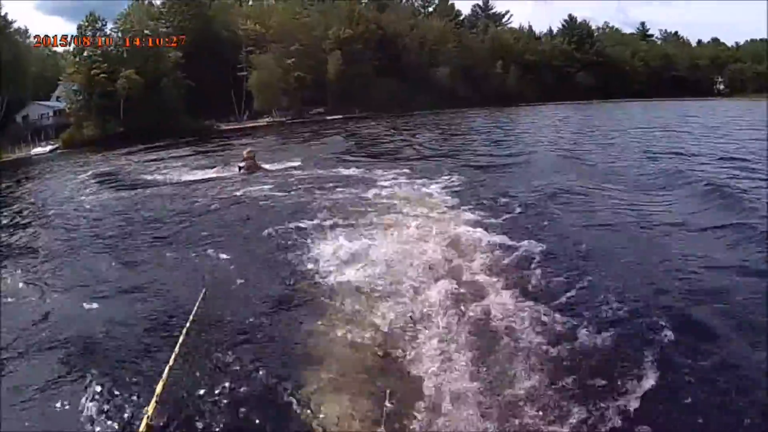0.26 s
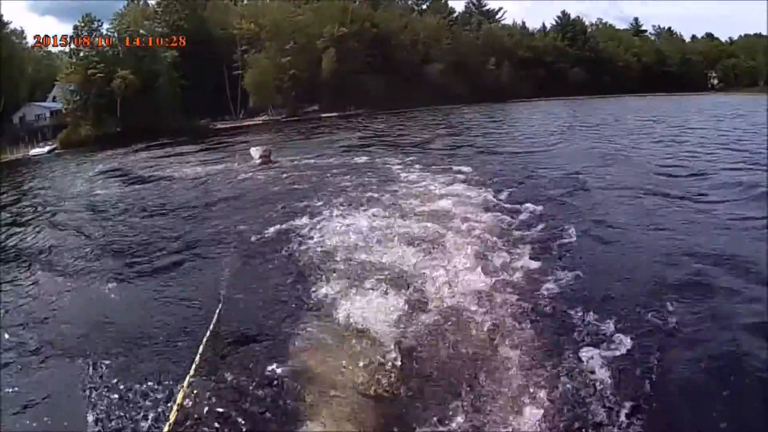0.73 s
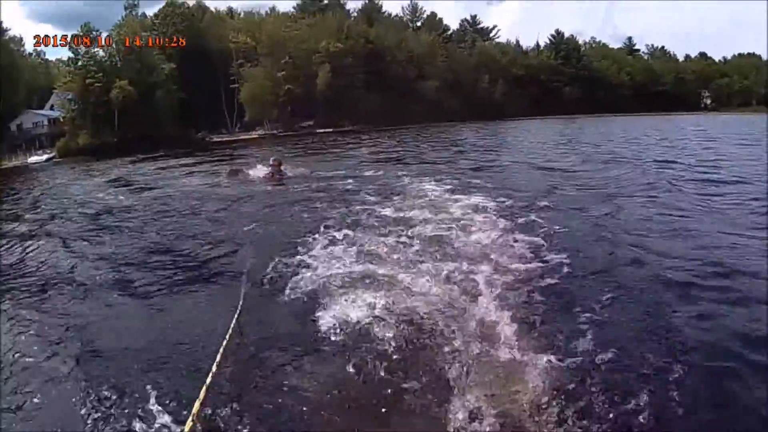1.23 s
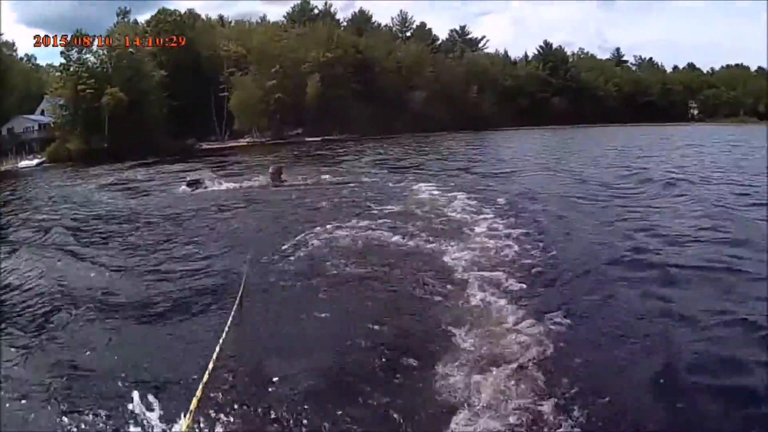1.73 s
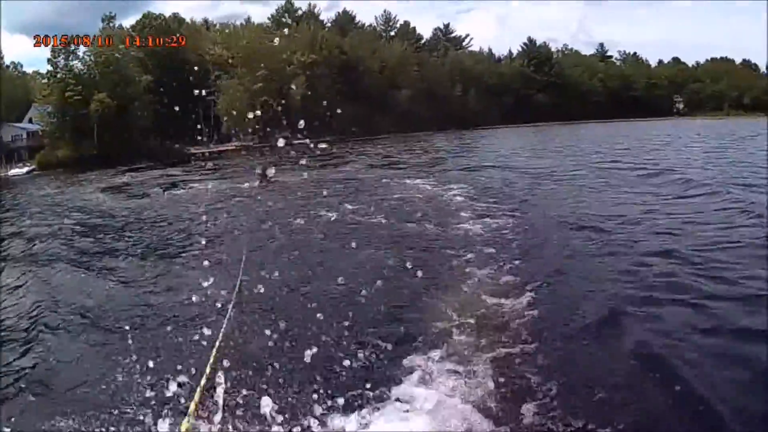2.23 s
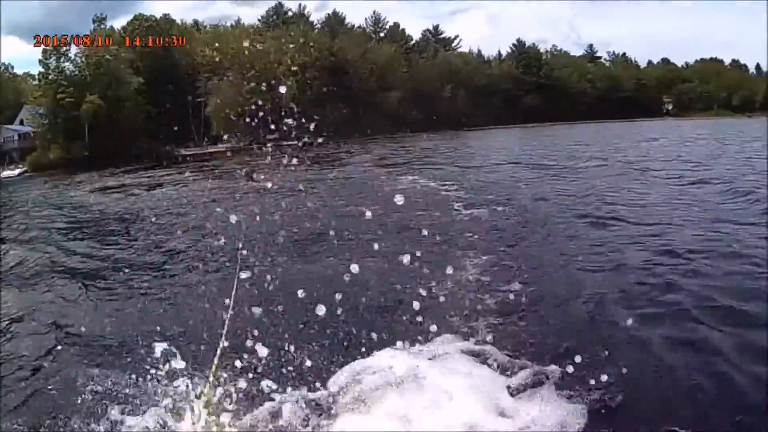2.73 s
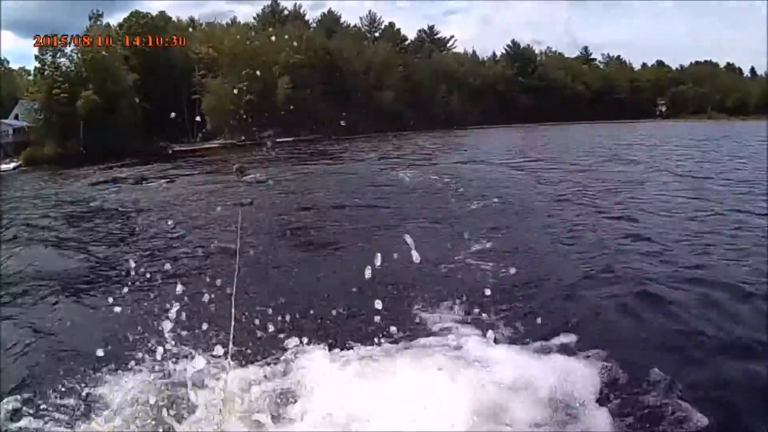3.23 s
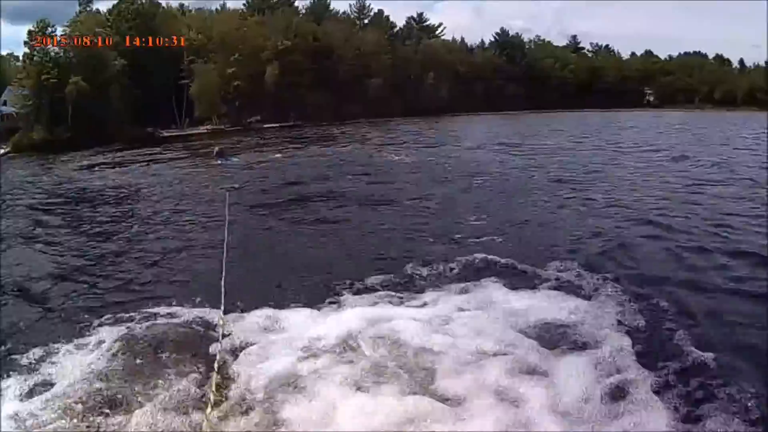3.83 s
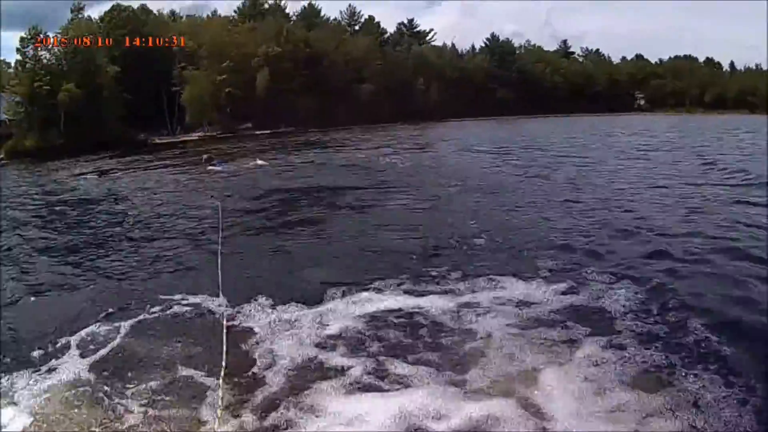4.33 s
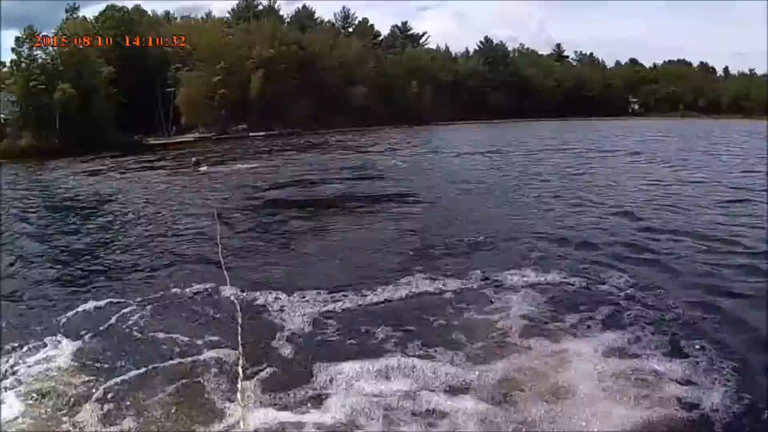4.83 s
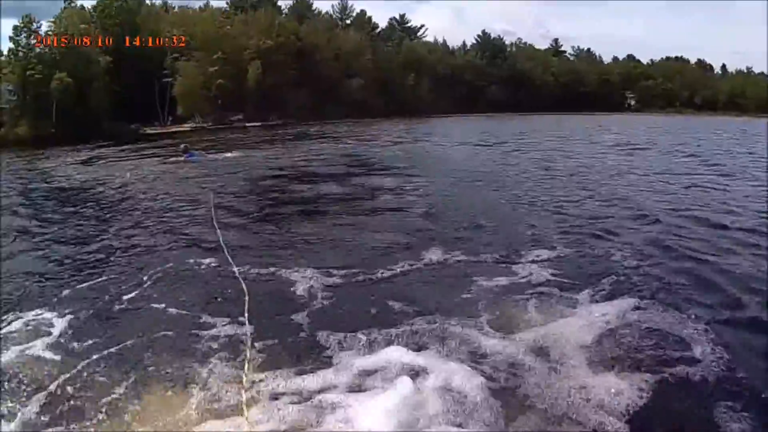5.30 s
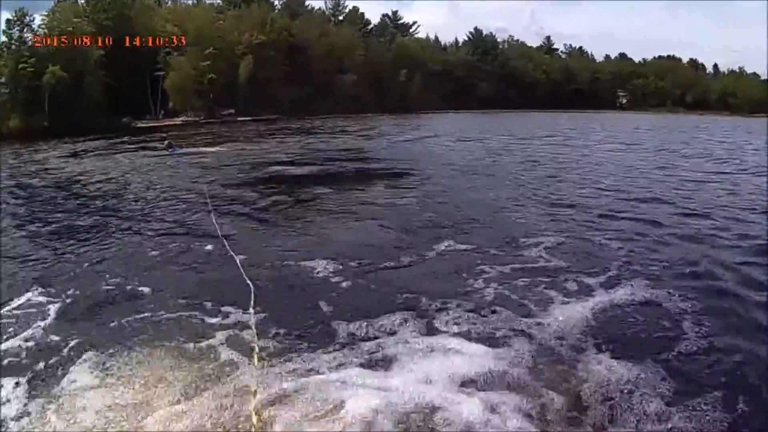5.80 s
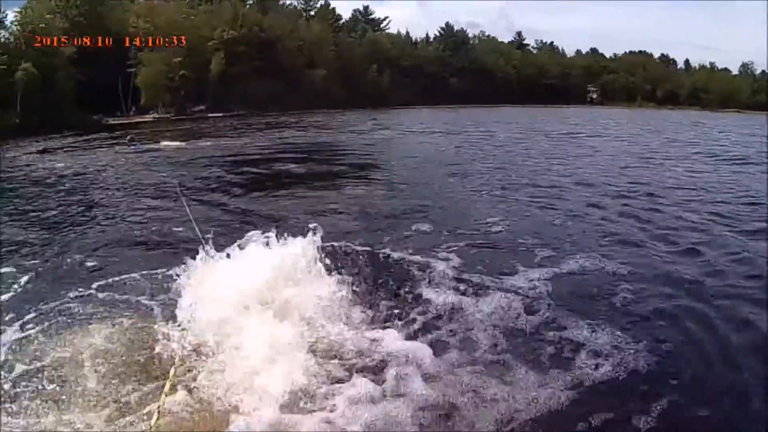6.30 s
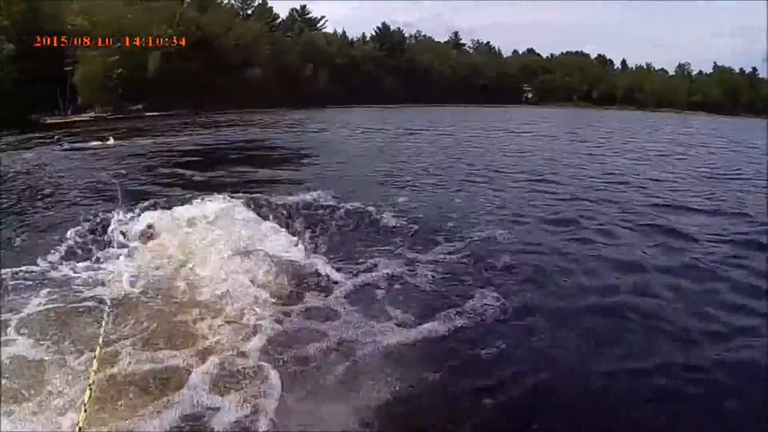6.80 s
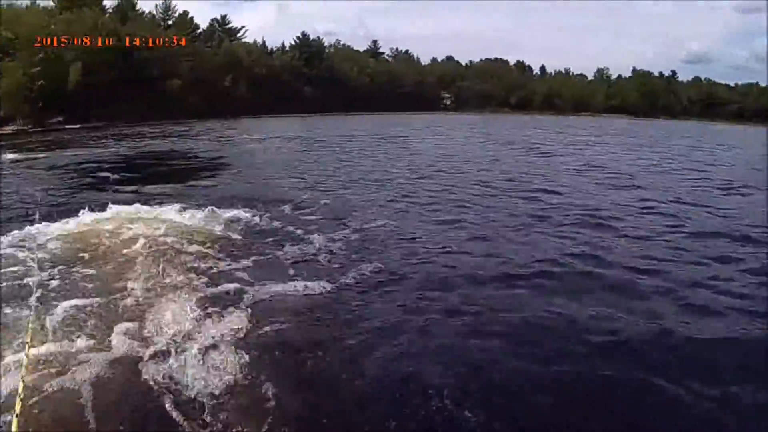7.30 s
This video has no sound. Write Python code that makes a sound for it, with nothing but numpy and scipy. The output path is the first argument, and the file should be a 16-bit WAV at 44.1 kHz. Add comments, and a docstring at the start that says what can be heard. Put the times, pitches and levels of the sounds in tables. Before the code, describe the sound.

A low twin-cylinder watercraft engine burbles at idle, blipping up in throttle several times amid gurgling exhaust, churning wake, splashes and spray.

```python
"""Slow personal watercraft, heard from its stern

A personal watercraft crosses a lake with five blips of throttle. Harmonics of the shaft frequency, shaped
by pipe resonances, form the drone of its twin-cylinder exhaust. Filtered noise and bubble resonances,
pulsed by the same shaft, give the ragged puffs, glugs and surging churn of the wake. Random impacts make
the patter of spray, shaped noise the splashes and knocks, and two wavering sinusoids a faint drive whine."""
import sys
import numpy as np
from scipy import signal
from scipy.fft import rfft, irfft
from scipy.io import wavfile

SR = 44100
rng = np.random.default_rng(int(sys.argv[2]) if len(sys.argv) > 2 else 0)


def materialize(psi):
    """Save the field psi as 16-bit PCM at rate SR to the path in sys.argv[1].

    A 1-D psi becomes a single channel; in a 2-D psi each row is a channel.
    """
    bounded = np.clip(np.atleast_2d(psi).T, -1, 1)
    quanta = np.round(bounded * 32767).astype(np.int16)
    wavfile.write(sys.argv[1], SR, quanta)


N = 333004
TIME = np.arange(N) / SR  # s

# fizz of the foam, before its flicker: t/s, level/dB
FOAM = [(0.05, -49.5), (0.46, -47.5), (3.5, -52.5), (3.8, -58.5), (4.35, -61), (4.7, -55.5), (5.82, -58.5),
        (5.94, -51), (7.02, -56.5), (7.27, -49), (7.5, -55)]
# steady churning of the wake: t/s, level/dB
WAKE = [(0, -20.5), (1.1, -22.5), (1.5, -23), (2.15, -36), (2.6, -21), (3.2, -22.5), (3.35, -28.5),
        (4.3, -28), (4.55, -24.5), (5.4, -26), (6.95, -24.5), (7.55, -21)]
# relative spectral density of each kind of water noise: f/Hz, level/dB
CHURN_COLOUR = [(260, -5), (400, -1), (540, -3), (750, -3), (930, 0.5), (1020, -4), (1090, -2), (1350, -6),
                (1650, -22.5), (2200, -28)]
SPRAY_COLOUR = [(1000, 8.5), (1960, 6), (2230, 0.5), (2600, 1), (3700, -4.5), (4200, -11.5), (4600, -7.5),
                (5400, -11), (6300, -20.5), (6950, -13), (7700, -21)]
FOAM_COLOUR = [(5000, -2), (7000, 4), (8500, -7), (9700, -5.5), (10700, 0), (11700, -2.5), (13200, -11),
               (15200, -9.5), (16000, -22)]
GURGLE_COLOUR = [(100, 6), (135, 3.5), (195, 4.5), (285, 2.5), (350, 0), (420, 2.5), (540, -9.5)]
RUMBLE_COLOUR = [(30, 5.3), (45, 13.4), (62, 13), (100, 7.7)]
# large gulps of exhaust gas: t/s, starting f/Hz, ending f/Hz, length/s, peak level/dB
GLUGS = [(.155, 165, 143, 0.051, -8), (.68, 157, 188, 0.087, -10.5), (0.741, 208, 237, 0.047, -15),
         (0.924, 374, 390, 0.035, -13), (1.601, 221, 243.7, 0.04, -8), (1.76, 166.5, 155, 0.094, -9.5),
         (2.195, 115, 110, 0.07, -12.5), (2.286, 275.3, 287, 0.045, -9.5), (2.462, 204, 253, 0.043, -5),
         (2.741, 217, 321, 0.071, -6.5), (2.97, 148, 161, 0.062, -14), (6.825, 106, 85, 0.033, -5)]
# slaps and splashes: t/s, bright crash level/dB, dark slap level/dB
SPLASHES = [(0.211, -20.5, -12.5), (0.379, -24, -12.5), (0.649, -23, -22), (0.698, -35, -10.5),
            (1.577, -38, -16.5), (2.092, -20, -24), (2.129, -26, -18), (2.198, -31, -22), (2.511, -39, -28),
            (2.378, -22.5, -36), (2.863, -20.5, -17), (2.883, -19, -30), (3.425, -36, -38), (4.5, -41, -34),
            (5.677, -30, -18), (5.879, -31, -15), (5.923, -29.5, -33), (5.985, -20.5, -17),
            (6.316, -31, -24), (6.572, -28, -13.5), (7.126, -29.5, -22), (7.308, -31, -14.5),
            (7.458, -28, -17)]
# brief high ticks of single drops: t/s, starting level/dB
DROPS = [(.169, -36), (0.27, -34), (.382, -34), (0.919, -39), (3.57, -41), (5.945, -38), (7.252, -37)]
# air pockets clapping shut: t/s, starting f/Hz, peak level/dB
PLOPS = [(1.665, 710, -5), (1.708, 650, -1.5), (2.979, 870, -6.5), (5.968, 734, -7), (6.14, 433, -17),
         (6.15, 980, -2.5), (7.244, 703, -11)]
# surges of white water: t/s, attack/s, length/s, release/s, churn level/dB, gurgle level/dB (before its
# share of the flow), growth while it lasts/(dB/s)
SURGES = [(0.645, 0.042, 0.043, 0.013, -16.5, -30, -6), (0.851, 0.021, 0.062, 0.22, -17, -20, -1),
          (1.12, 0.053, 0.052, 0.15, -22, -14.5, -17), (1.555, 0.034, 0.15, 0.57, -19, -16.5, 14),
          (2.192, 0.029, 0.27, 0.075, -14.5, -16.5, -10.5), (2.694, 0.055, 0.38, 0.033, -18.5, -15.5, -6),
          (4.8, 0.078, 0.5, .15, -41, -19.5, -16), (5.927, 0.07, 0.15, 0.055, -17.5, -22, -6),
          (6.097, 0.022, 0.14, 0.017, -16, -14.5, -15), (6.303, 0.013, 0.057, 0.018, -18.5, -14.5, -9),
          (6.415, 0.052, 0.079, 0.049, -20, -17, 5), (6.732, 0.054, 0.099, 0.031, -25, -40, -8),
          (7.15, 0.096, 0.33, 0.016, -20, -20, -1)]
# firing note at idle speed, before chokes: t/s, rms level/dB
FIRING = [(0, -34), (.13, -23.5), (.8, -27), (1.18, -20), (1.45, -21.5), (1.6, -32), (1.95, -19.5),
          (2.7, -20), (2.9, -21.5), (3.25, -20.5), (3.7, -18), (4.3, -20), (4.75, -18), (6.5, -18.5),
          (6.7, -21.5), (6.97, -24), (7.06, -13.5), (7.55, -18)]
# third shaft order at idle speed, before flutter: t/s, rms level/dB
THIRD = [(.06, -13), (.2, -19.5), (.35, -14), (.7, -24), (.85, -15.5), (1.05, -31), (1.44, -16.5),
         (1.6, -24.5), (3.3, -21.5), (3.5, -21.5), (4.21, -21), (4.33, -24), (4.5, -20), (5.45, -28),
         (5.56, -15.5), (5.73, -23.5), (5.96, -18.5), (6.2, -24)]
# fourth shaft order relative to the third: t/s, level/dB
FOURTH = [(0, -19), (.25, -13), (.65, -3), (.9, -25.5), (7.55, -13)]
# resonances of exhaust and muffler, before tuning: f/Hz, half width/Hz, gain at the peak/dB
PIPE = [(76.4, 16, -17.5), (241.3, 23.7, -17.5), (400.5, 13.7, -27), (786, 270, -38)]
# tuning of those resonances as water rises and falls in the pipe: t/s, frequency ratio
PIPE_TUNING = [(.4, 0.85), (1.3, 1.043), (4.2, 1.023), (5.35, 0.981), (6.2, 1.035)]
# change of the growl as the outlet dips and clears: t/s, level/dB
OUTLET = [(0, -2), (.7, -3.5), (1.05, -6), (1.75, -1.5), (2.05, -7), (2.6, -2), (3.25, -2.5), (3.6, -4),
          (4.4, -5), (5.35, 0), (5.7, -3.5), (7.55, -8.5)]
# water smothers the outlet and chokes the firing note: t/s, half length/s, depth/dB
CHOKES = [(1.723, 0.093, 2.5), (2.493, 0.033, 13), (3.02, 0.032, 9), (6.145, 0.045, 19), (6.322, .014, 17),
          (7.24, 0.048, 4)]
# thin tones of the drive, before their wavering: f/Hz, peak level/dB
WHINE = [(4425, -66), (5160, -62)]
# shaft speed between blips: t/s, f/Hz
IDLE = [(0, 46.2), (.3, 44.65), (.8, 45.75), (1.0, 43.93), (3.37, 44.38), (3.58, 41.18), (3.85, 43.75),
        (4.08, 44.22), (4.22, 42.9), (4.6, 44.67), (5.35, 46.43), (5.53, 44.49), (5.95, 46.1), (6.9, 43.84),
        (7.08, 47.83), (7.55, 52.83)]
# blips of throttle: start t/s, rise/s, coast/s, speed gained/Hz
BLIPS = [(1.6, .18, 0.42, 34.2), (2.29, 0.26, 0.24, 28.8), (2.78, 0.25, 0.33, 34.6), (5.99, .21, .475, 33),
         (7.381, 0.11, 0.63, 11)]
# how every blip runs down: share of the coast, share of the gained speed left
COAST = [(0, 1), (.17, .76), (.43, .48), (.82, .34), (1, 0)]

RISE_CURVE = 1.15  # exponent above 1: the shaft picks up slowly at first
LIFT_DB, LIFT_HZ = 7, 6.9  # the firing note grows by this much over the first few Hz above idle
LULL_DB, LULL_LEAD_S, LULL_S = 8, 0.014, 0.034  # the engine quietens just before settling to idle
THIRD_DB_PER_OCTAVE = -21.5  # the third order fades as the shaft speeds up
THROB_DB, STEADYING = 2.0, 0.55  # firings differ in strength; share of this lost while coasting
BARK_HZ, BARK_WIDTH_HZ, BARK_DB = 370, 200, -23.5  # broad rasp of the pipe on open throttle
CLATTER_DB, CLATTER_S = -36.5, 0.0013  # rms level and decay of the knocks
# layers following the wake: (dB when the wake is at WAKE_REF_DB, dB gained per dB of wake)
GURGLE, RUMBLE, SPRAY = (-23, 0.3), (-29, 0.68), (-36.5, 0.45)
WAKE_REF_DB, FOAM_REF_DB = -26.5, -54
SPRAY_PER_FOAM_DB = 0.53  # more droplets fall while the foam is fresh
THROWN_DB = -13.5  # spray thrown up by a surge, relative to its churn
CLEAR_DB = 2  # a coasting engine blows cleanly, with this much less gurgle
PLOP_CYCLES = 0.58  # cycles until a plop is loudest
SPLASH_T60_S, SPLASH_RISE_S = 0.059, 0.0032
PATS_PER_S, PAT_S, PAT_DB = 30, 0.002, -12  # rate, decay, and level relative to the spray
EDGE_HZ = 15750  # upper limit of the whole sound


def amp(db):
    """Level to amplitude ratio: 20 dB per factor of ten."""
    return 10 ** (np.asarray(db) / 20)


def unit(x):
    """Normalisation to an rms value of 1."""
    return x / np.sqrt(np.mean(x ** 2) + 1e-20)


def curve(table):
    """Linear interpolation of a timed table, sample by sample."""
    return np.interp(TIME, *np.transpose(table))


def hump(s, width_s):
    """Gaussian bump of height 1 around a moment."""
    return np.exp(-((TIME - s) / width_s) ** 2)


def add(mix, s, sound):
    """Superposition of a sound starting at a given time."""
    part = mix[max(round(s * SR), 0):][:len(sound)]
    part += sound[:len(part)]


def colour(x, points):
    """Minimum-phase filtering: the Hilbert transform of log gain gives a causal response; rms 1 out."""
    size = 8192
    hz, db = np.transpose(points)
    octave = np.log2(np.abs(np.fft.fftfreq(size, 1 / SR)) + 1)
    knots = np.log2(hz)
    outside = np.abs(octave - np.clip(octave, knots[0], knots[-1]))
    # 24 dB per octave of fall past either end
    gain_db = np.maximum(np.interp(octave, knots, db) - 24 * outside, -100)
    log_gain = np.log(amp(gain_db))
    response = np.fft.ifft(np.exp(np.conj(signal.hilbert(log_gain)))).real[:size // 2]
    return unit(signal.oaconvolve(x, response)[:len(x)])


def wander(hz):
    """Low-passed random fluctuation, rms 1, with a Gaussian roll-off at the given rate."""
    s = np.arange(0, N / SR + 1, 0.001)
    f = np.fft.rfftfreq(len(s), s[1])
    spectrum = rfft(rng.standard_normal(len(s))) * np.exp(-(f / hz) ** 2)
    return np.interp(TIME, s, unit(irfft(spectrum, len(s))))


def band_noise(lo_hz, hi_hz):
    """Band-pass filtered white noise, rms 1."""
    sos = signal.butter(3, [lo_hz, hi_hz], "band", fs=SR, output="sos")
    return unit(signal.sosfilt(sos, rng.standard_normal(N)))


def patter(per_s, spread_db):
    """Random impulse train: many small impacts and a few large, rms 1."""
    size = amp(spread_db * np.minimum(rng.exponential(1, N), 5))
    hits = rng.random(N) < per_s / SR
    return unit(size * rng.choice([-1, 1], N) * hits)


def bubbles(lo_hz, hi_hz, per_s, cycles, spread_db, count):
    """Bubble resonance: many sizes ring and decay, each rising in pitch as it nears the surface."""
    out = np.zeros(N)
    for hz in np.geomspace(lo_hz, hi_hz, count):
        age = np.arange(0, 5, hz / (cycles * SR))  # in decay times
        ring = np.exp(-age) * np.sin(2 * np.pi * cycles * (age + 0.0469 * age ** 2))
        for when, size, side in rng.random((int(per_s * N / SR / count), 3)):
            level = amp(-spread_db * np.log(size + 0.046)) * np.sqrt(hz / lo_hz)
            add(out, when * N / SR, np.sign(side - 0.5) * level * ring)
    return unit(out)


def puffs(turns, depth, lag):
    """Pulsating gas flow: two puffs a turn, one cylinder blowing harder than the other."""
    angle = 2 * np.pi * (turns - lag)
    return unit(np.exp(depth * (np.cos(2 * angle) + 0.5 * np.cos(angle))))


def with_wake(db, slope):
    """Level dependence: gain of a layer that rises and falls with the wake."""
    return amp(db + slope * (curve(WAKE) - WAKE_REF_DB))


def whine():
    """Amplitude and frequency modulation: two thin tones of the drive come and go."""
    out = np.zeros(N)
    for hz, db in WHINE:
        phase = 2 * np.pi * np.cumsum(hz + 36 * wander(120)) / SR
        out += amp(db + 3.5 * wander(28)) * np.sin(phase)
    return out


def pats():
    """Exponentially decaying noise bursts: fat drops land with short taps."""
    hits = (rng.random(N) < PATS_PER_S / SR) * amp(3 * np.minimum(rng.exponential(1, N), 3))
    burst = signal.lfilter([1], [1, -np.exp(-1 / (PAT_S * SR))], hits)
    return amp(PAT_DB) * unit(burst * band_noise(1500, 4200))


def spray(surge):
    """Random impact noise: droplets rain on the lake and seethe where they land; the foam fizzes."""
    plinks = bubbles(1250.0, 6160, per_s=700, cycles=13.5, spread_db=2.0, count=36)
    impacts = patter(per_s=4500, spread_db=4.0)
    droplets = colour(impacts + rng.standard_normal(N) + 0.33 * plinks, SPRAY_COLOUR)
    fizz = colour(patter(per_s=3700, spread_db=5.0) + 0.83 * rng.standard_normal(N), FOAM_COLOUR)
    seethe = band_noise(1163, 1506)
    gusts = amp(1.3 * wander(30))
    froth = amp(1.5 * wander(28))
    steady = with_wake(*SPRAY) * amp(SPRAY_PER_FOAM_DB * (curve(FOAM) - FOAM_REF_DB))
    falling = np.hypot(steady, amp(THROWN_DB) * surge)
    return gusts * (falling * (droplets + seethe + pats()) + amp(curve(FOAM)) * froth * fizz)


def splashes():
    """Transient noise with exponential decay: sheets of water slap and crash; a few drops tick."""
    bright, dark, ticks = np.zeros((3, N))
    t = TIME[:SR // 4]
    rise = np.minimum(t / SPLASH_RISE_S, 1)
    shape = rise * np.exp(-np.log(1000) * np.maximum(t - SPLASH_RISE_S, 0) / SPLASH_T60_S)
    for s, crash_db, slap_db in SPLASHES:
        add(bright, s, amp(crash_db) * shape)
        add(dark, s, amp(slap_db) * shape)
    for s, peak_db in DROPS:
        add(ticks, s, amp(peak_db) * np.exp(-t / 0.0032))
    crash_colour = [(1800, 19.0), (3000, 5.5), (5800, -3.5), (12000, -18.0)]  # f/Hz, level/dB
    crash = colour(patter(per_s=4000, spread_db=1.5), crash_colour)
    return bright * crash + dark * band_noise(800, 1420) + ticks * band_noise(8300, 14000)


def plops():
    """Cavity resonance: a pocket of air trapped by falling water claps shut and rings a few cycles."""
    out = np.zeros(N)
    t = TIME[:SR // 20]
    for s, hz, db in PLOPS:
        age = t * hz / PLOP_CYCLES
        envelope = age * np.exp(1 - age)
        add(out, s, amp(db) * envelope * np.sin(2 * np.pi * hz * t * (1 + 0.0032 * age)))
    return out


def glugs():
    """Resonance of one large bubble: the pitch of each gulp slides as the bubble changes shape."""
    out = np.zeros(N)
    for s, start_hz, end_hz, length, db in GLUGS:
        hz = np.linspace(start_hz, end_hz, int(length * SR))
        swell = np.sin(np.pi * np.linspace(0, 1, len(hz)) ** 0.85)
        add(out, s, amp(db) * swell * np.sin(2 * np.pi * np.cumsum(hz) / SR))
    return out


def surges():
    """Addition of powers: surges swell, grow or sag, then die away; gives gains of churn and gurgle."""
    power = np.zeros((2, N))
    t = TIME[:SR]
    for s, attack, length, release, churn_db, gurgle_db, growth in SURGES:
        swell = np.minimum(t / attack, 1) * amp(growth * np.minimum(t, length))
        shape = swell * np.exp(-np.maximum(t - length, 0) / release)
        add(power[0], s, (amp(churn_db) * shape) ** 2)
        add(power[1], s, (amp(gurgle_db) * shape) ** 2)
    return np.sqrt(power)


def gurgle(turns, surge):
    """Collapse of gas pockets: pulsed low impacts under the stern, over the rumble of the wake."""
    impacts = patter(per_s=900, spread_db=2.0) * puffs(turns, depth=0.52, lag=0.0049)
    pockets = colour(impacts, GURGLE_COLOUR)
    rumble = colour(rng.standard_normal(N), RUMBLE_COLOUR)
    flow = np.hypot(with_wake(*GURGLE), surge)
    share = (flow / np.max(flow)) ** 0.45  # gentle flow leaves in the drone rather than in pockets
    return flow * share * pockets + with_wake(*RUMBLE) * rumble


def churn(turns, surge):
    """Modulated flow noise: exhaust bursts through the jet's white water, tearing it into bubbles."""
    torn = patter(per_s=7000, spread_db=1) * amp(3.5 * wander(55))
    ringing = bubbles(292.4, 2180, per_s=900, cycles=3.45, spread_db=3.0, count=32)
    water = (torn + 0.6 * ringing) * puffs(turns, depth=0.1, lag=0.034)
    # the heaving lake surface returns a shifting reflection
    delay_s = 0.00349 + 0.00048 * wander(1.27)
    reflected = np.interp(TIME - delay_s, TIME, water)
    return np.hypot(amp(curve(WAKE)), surge) * colour(water + 0.36 * reflected, CHURN_COLOUR)


def clatter(turns, shaft_hz):
    """Structure-borne impacts: four knocks a turn through the hull, of random strength, one favoured."""
    knock, since = np.divmod(4 * turns, 1)
    strength = amp(4 * rng.standard_normal(N)[knock.astype(int)] + 4 * (knock % 4 == 0))
    decaying = strength * np.exp(-since / (4 * shaft_hz * CLATTER_S))
    return amp(CLATTER_DB) * colour(decaying * rng.standard_normal(N), [(450, 0), (1300, -2)])


def throttle():
    """Rotational inertia: blips wind the shaft up, then it coasts; gives added Hz, lull dB, coasting 0-1."""
    extra_hz, lull_db, coasting = np.zeros((3, N))
    for start, rise, coast, gain_hz in BLIPS:
        top = start + rise
        wound_up = np.clip((TIME - start) / rise, 0, 1) ** RISE_CURVE
        run_down = np.clip((TIME - top) / coast, 0, 1)
        extra_hz += gain_hz * wound_up * np.interp(run_down, *np.transpose(COAST))
        lull_db += LULL_DB * hump(top + coast - LULL_LEAD_S, LULL_S)
        coasting += np.minimum(2 * np.sin(np.pi * run_down), 1)
    return extra_hz, lull_db, coasting


def growl(turns, shaft_hz, count):
    """Resonant amplification: shaft orders swell as they slide through the pipe's resonances."""
    angle = 2 * np.pi * turns + 0.059 * wander(52)  # each firing comes slightly early or late
    tuning = curve(PIPE_TUNING) * (1 + 0.025 * wander(11.5))
    load = sum(hump(start + 0.76 * rise, 0.67 * rise) for start, rise, _, _ in BLIPS)
    out = np.zeros(N)
    for k in [1, *range(4, count)]:
        power = np.zeros(N)
        for hz, width, db in PIPE:
            power += (amp(db) / (1 + ((k * shaft_hz - hz * tuning) / width) ** 2)) ** 2
        bark = load * amp(BARK_DB) / (1 + ((k * shaft_hz - BARK_HZ) / BARK_WIDTH_HZ) ** 2)
        gain = np.hypot(np.sqrt(power), bark)
        scatter = 2 * np.pi * rng.random()  # the muffler smears each pulse
        flutter = amp(2.2 * wander(20)) * np.cos(k * angle + scatter + 0.25 * wander(25))
        out += gain * flutter
    # 2 dB louder per octave of shaft speed
    return out * amp(curve(OUTLET) + 2 * np.log2(shaft_hz / np.min(shaft_hz)))


def drone(turns, note_db, third_db):
    """Harmonic synthesis: a firing note, and two orders from unequal cylinders fluttering under water."""
    angle = 2 * np.pi * turns
    note = amp(curve(FIRING) + note_db) * np.cos(2 * angle)
    third, fourth = (amp(2.2 * wander(18)) * np.sin(k * angle + 0.3 * wander(30)) for k in (3, 4))
    upper = amp(curve(THIRD) + third_db) * (third + amp(curve(FOURTH)) * fourth)
    return np.sqrt(2) * (note + upper)


def scene():
    """Common excitation: one shaft drives exhaust and pulsing water; surges swell the wake."""
    extra_hz, lull_db, coasting = throttle()
    choke_db = sum(db * hump(s, half_s) for s, half_s, db in CHOKES)
    shaft_hz = curve(IDLE) + extra_hz
    turns = np.cumsum(shaft_hz * (1 + 0.00747 * wander(19.92))) / SR

    white_water, gas = surges()
    water = spray(white_water) + splashes() + plops() + glugs()
    water += amp(-CLEAR_DB * coasting) * gurgle(turns, gas) + churn(turns, white_water)

    note_db = LIFT_DB * np.tanh(extra_hz / LIFT_HZ) - choke_db
    third_db = THIRD_DB_PER_OCTAVE * np.log2(shaft_hz / curve(IDLE))
    throb_db = THROB_DB * (1 - STEADYING * coasting) * wander(61)
    engine = growl(turns, shaft_hz, count=28) + drone(turns, note_db, third_db)
    exhaust = amp(throb_db - lull_db) * engine
    return (whine() + water + clatter(turns, shaft_hz) + exhaust)[None]


def record(dry):
    """Soft saturation and low-pass filtering: peaks are rounded, the ends faded, the band limited."""
    rounded = dry / (1 + dry ** 8) ** (1 / 8)
    faded = rounded * signal.windows.tukey(N, 0.0008)
    low_pass = signal.firwin(511, EDGE_HZ, window=("kaiser", 9), fs=SR)
    return signal.oaconvolve(faded, low_pass[None], "same")


dry = scene()
out = record(dry)
materialize(out)
```